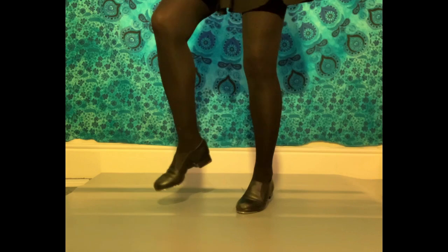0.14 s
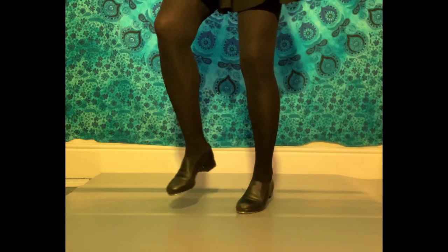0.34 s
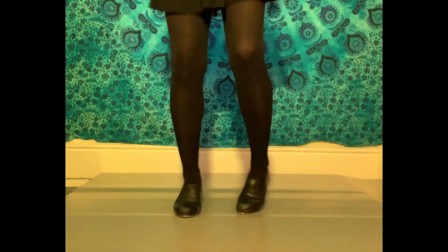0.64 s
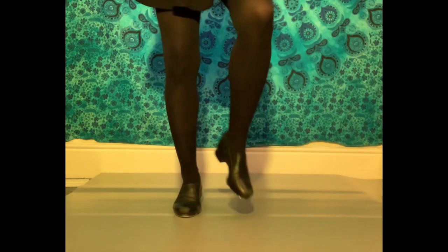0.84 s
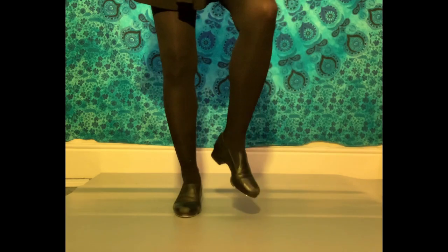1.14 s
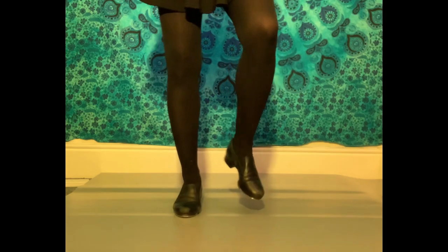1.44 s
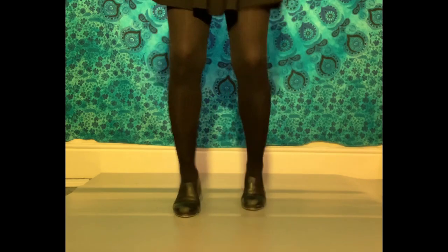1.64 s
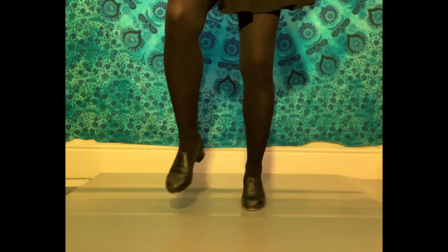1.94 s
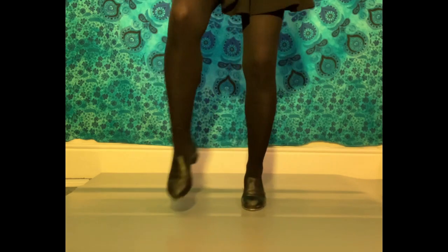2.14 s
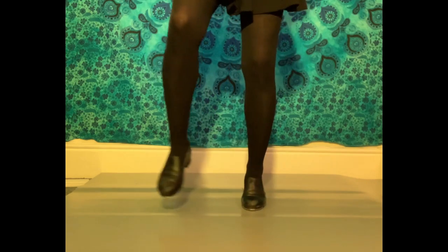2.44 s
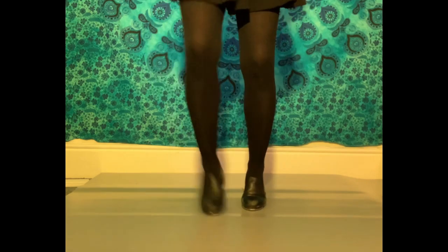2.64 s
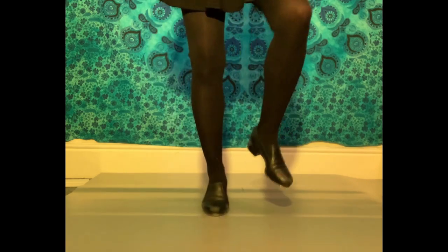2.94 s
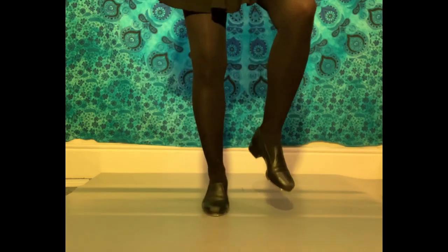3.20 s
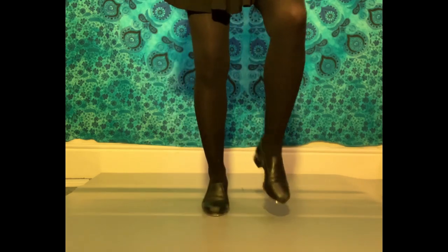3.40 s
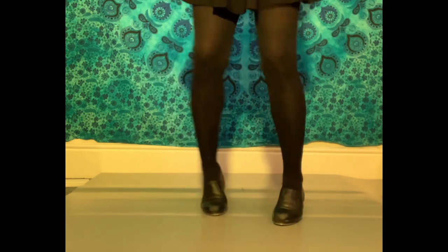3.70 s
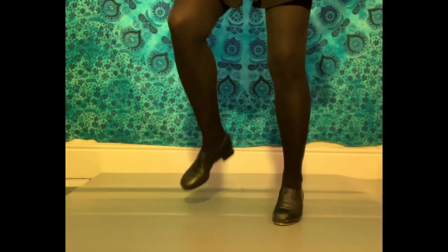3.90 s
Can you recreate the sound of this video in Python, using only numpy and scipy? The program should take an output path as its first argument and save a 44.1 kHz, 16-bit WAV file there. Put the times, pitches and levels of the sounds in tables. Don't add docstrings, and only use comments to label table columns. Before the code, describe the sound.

Four single tap-shoe strikes, about a second apart, crack on a hard board in a small quiet room, each with a low floor boom.

```python
import sys
import numpy as np
from scipy import signal
from scipy.io import wavfile

SR = 44100
rng = np.random.default_rng(int(sys.argv[2]) if len(sys.argv) > 2 else 0)


def master_out(mix):
    frames = np.transpose(np.atleast_2d(mix))
    ceiling = np.clip(frames, -1, 1)
    pcm = np.round(ceiling * 32767).astype(np.int16)
    wavfile.write(sys.argv[1], SR, pcm)


def rack_gain(trim_db):
    fader = np.asarray(trim_db, float)
    return 10 ** (fader / 20)


N = 178998

# start_s [s], boom_db [dB], boom_hz [Hz], sway_db [dB]
LANDINGS = [
    (0.654, -18, 75.3, -31),
    (1.707, -15.5, 76, -32.5),
    (2.763, -21, 75.8, -36.5),
    (3.724, -17, 70.1, -37),
]


def at_hz(points, hz):
    table = np.array(points)
    return np.interp(np.log(hz), np.log(table[:, 0]), table[:, 1])


def rms_one(x):
    return x / np.sqrt(np.mean(x ** 2) + 1e-20)


def early_rms_one(x):
    return x / np.sqrt(np.mean(x[:SR // 20] ** 2))


def add(out, start_s, sound):
    at = max(round(start_s * SR), 0)
    out[at:at + len(sound)] += sound[:max(N - at, 0)]


def unit_click(length):
    click = np.zeros(length)
    click[0] = 1
    return click


def wander(length, step):
    knots = length // step + 2
    return np.interp(np.arange(length) / step, np.arange(knots), rng.standard_normal(knots))


def ring(x, hz, t60):
    radius = rack_gain(-60 / (t60 * SR))
    angle = 2 * np.pi * hz / SR
    return signal.lfilter([0, np.sin(angle)], [1, -2 * radius * np.cos(angle), radius ** 2], x + 1e-18)


def bands(white):
    edges_hz = 20 * 2 ** np.arange(0, 9.8, 1 / 3)
    for k, (low, high) in enumerate(zip(edges_hz, edges_hz[1:])):
        sos = signal.butter(2, [low, high], "band", fs=SR, output="sos")
        yield np.sqrt(low * high), signal.sosfilt(sos, white[k % 2])


def room_tail(colour_db, build_s, stretch, rough_db):
    # band_hz [Hz], t60_s [s]
    room_t60 = [(120, 0.32), (350, 0.29), (1000, 0.3), (2700, 0.26), (4500, 0.21), (6500, 0.21),
                (10000, 0.2), (15000, .2)]
    t = np.arange(SR * 2 // 3) / SR
    bursts = rack_gain(rough_db * np.exp(-t / 0.052) * wander(len(t), step=SR // 1200))
    build = (1 - np.exp(-t / build_s)) ** 2
    white = rng.standard_normal((2, len(t))) * bursts * build
    tail = np.zeros(len(t))
    for hz, band in bands(white):
        if hz > 90:
            decay_db = -60 * t / (stretch * at_hz(room_t60, hz))
            patches_db = 1.7 * wander(len(t), step=SR // 40)
            tail += rack_gain(colour_db(hz) + decay_db + patches_db) * band
    return early_rms_one(tail)


def background():
    # band_hz [Hz], density_db [dB per Hz]
    hum_colour = [(12, -36), (20, -5.5), (74, -3), (90, -9), (109, -19.5), (171, -14), (267, -27.5),
                  (353, -23.5), (551, -28.5), (837, -22), (1170, -35), (2410, -37), (3190, -41),
                  (4840, -41), (15600, -51.5)]
    # tone_hz [Hz], level_db [dB rms]
    whines = [(468, -68), (791, -78), (2550, -79.5), (8296, -83.5)]
    t = np.arange(SR) / SR
    swell_db = 1 * wander(N, step=round(0.73 * SR))
    shake_db, rise_s, fall_s = 5, .1, .1
    for start_s, *_ in LANDINGS:
        add(swell_db, start_s, 2 * shake_db * (1 - np.exp(-t / rise_s)) * np.exp(-t / fall_s))
    swell_db -= swell_db.mean()
    white = rng.standard_normal((2, N + SR // 2))
    hum = np.zeros(N)
    for hz, band in bands(white):
        hum += rack_gain(at_hz(hum_colour, hz) + swell_db * (hz < 110)) * band[-N:]
    tones = sum(rack_gain(db) * rms_one(ring(white[0], hz, 0.11)[-N:]) for hz, db in whines)
    return rack_gain(-47.5) * rms_one(hum) + tones


def earlier_knock():
    # band_hz [Hz], density_db [dB per Hz]
    earlier_colour = [(120, -57), (200, -20), (242, -37.5), (317, -6.5), (430, -15.5), (488, -24.5),
                      (563, -14), (762, -16.5), (1400, -15.5), (1560, -12.5), (2810, -26.5), (3870, -21.5),
                      (9000, -39), (11700, -77), (19800, -120)]
    # mode_hz [Hz], level_db [dB], t60_s [s]
    earlier_modes = [(337, -36, 0.19), (490, -51.5, .9), (800, -49, .2), (1450, -48, 0.3), (1548, -52, .4),
                     (1580, -48, 0.55), (3850, -60, .5), (3900, -63, .5), (4016, -60, .4)]
    out = np.zeros(N)
    tail = room_tail(lambda f: at_hz(earlier_colour, f), build_s=0.00033, stretch=3.8, rough_db=1.5)
    add(out, 0, rack_gain(-51) * tail)
    click = unit_click(N)
    return out + sum(rack_gain(db) * ring(click, hz, t60) for hz, db, t60 in earlier_modes)


def clock():
    # band_hz [Hz], density_db [dB per Hz]
    clock_colour = [(530, -46), (900, -11), (1390, 0.5), (1630, -5.5), (2300, -8), (3350, -20), (5000, -27),
                    (6500, -53), (11000, -120)]
    pendulum_s = 1.999
    out = np.zeros(N)
    for swing in range(2):
        for start_s, level_db in ((.389, -60), (1.405, -62.5)):
            tail = room_tail(lambda f: at_hz(clock_colour, f), build_s=.006, stretch=.9, rough_db=3.0)
            add(out, start_s + pendulum_s * swing, rack_gain(level_db) * tail)
    return out


def soles():
    # start_s [s], level_db [dB], tilt_db [dB per octave], build_s [s]
    scuffs = [
        (0.734, -50.5, -3.5, 0.01),
        (1.648, -65, -4, .005),
        (1.9, -66.5, -1.5, .015),
        (2.808, -50, -2.5, 0.01),
        (2.921, -59, -7.5, 0.014),
        (3.675, -74, 0.5, 0.0039),
        (3.85, -52.5, -5, 0.018),
    ]
    out = np.zeros(N)
    for start_s, level_db, tilt_db, build_s in scuffs:
        colour = lambda f: tilt_db * np.log2(f / 4000) - 12 * max(np.log2(1500 / f), 0)
        add(out, start_s, rack_gain(level_db) * room_tail(colour, max(build_s, .001), stretch=.55, rough_db=2.5))
    return out


def beating(hz, split, t60):
    click = unit_click(SR * 2 // 3)
    swell = ring(ring(click, (1 + split) * hz, t60), (1 - split) * hz, t60)
    return swell / np.abs(swell).max()


def floor_answers():
    out = np.zeros(N)
    for start_s, boom_db, boom_hz, sway_db in LANDINGS:
        boom = rack_gain(boom_db) * beating(boom_hz, split=.075, t60=0.39)
        sway = rack_gain(sway_db) * beating(33, split=0.034, t60=.6)
        add(out, start_s, boom + sway)
    return out


def resonances(peaks):
    click = unit_click(SR // 2)
    modes = np.zeros(len(click))
    for hz, width_hz, db in peaks:
        t60 = np.clip(4.0 / width_hz, .06, .3)
        mode = ring(ring(click, hz, 0.074), hz, t60)
        modes += rack_gain(db) * rms_one(mode) * rng.choice([-1, 1])
    return early_rms_one(modes)


def board_cycles(hz):
    t = np.arange(SR // 100) / SR
    turns = hz * (.8 * t + .0007 * (1 - np.exp(-t / .001)))
    peak_s = .0009
    board = np.sin(2 * np.pi * turns) * t / peak_s * np.exp(1 - t / peak_s)
    return board - board.mean()


def plate_crack(clicks):
    cracks = .8 * clicks
    cracks[0] += 0.2
    flutter_s, first_db, loss_db = .0052, -5, 2.5
    turn = np.arange(1, 13)
    returns = ((turn + .06 * rng.standard_normal(len(turn))) * flutter_s * SR).astype(int)
    cracks[returns] += rack_gain(first_db - loss_db * turn + 2.5 * rng.standard_normal(len(turn)))
    modes = ((3800, 0.0071, 1), (6200, 0.0045, 1), (7400, .004, -0.78),
             (9500, 0.0023, 0.58), (13000, .002, .4))
    return sum(gain * ring(cracks, hz, t60) for hz, t60, gain in modes)


def board_thud(clicks):
    # mode_hz [Hz], level_db [dB], t60_s [s]
    thud_modes = [(178, -4.5, 0.084), (266, 1.5, 0.037), (355.6, 5.5, 0.038), (473, 2, 0.054)]
    thud = np.zeros(len(clicks))
    for k, (hz, db, t60) in enumerate(thud_modes):
        thud += rack_gain(db) * ring(clicks, hz, t60) * (-1) ** k
    push_s, width_s, push_db = .0052, .0007, 11
    lag = (np.arange(len(clicks)) / SR - push_s) / width_s
    return thud - rack_gain(push_db) * lag * np.exp(-lag ** 2 / 2)


def knock(foot, thud_db):
    # delay_s [s], left_db [dB], right_db [dB]
    echoes = [(0, -12, 1.5), (.0017, 1, -25), (.0049, -5, -4), (.0075, -14, -12), (.0152, -5, -9),
              (.0205, -9, -10)]
    clicks = np.zeros(SR // 8)
    for k, echo in enumerate(echoes):
        clicks[round(echo[0] * SR)] = rack_gain(echo[1 + foot]) * (-1) ** k
    board = np.convolve(clicks, board_cycles((1147, 1276)[foot]))[:len(clicks)]
    return board + rack_gain(-11.0) * plate_crack(clicks) + rack_gain(thud_db) * board_thud(clicks)


def taps():
    # start_s [s], peak_db [dB], tail_db [dB], pitch_factor [ratio, by landing spot], thud_db [dB]
    tap_list = [
        (.6295, -1.5, -15, 1, -16.5),
        (1.6648, -3, -18.5, 1.32, -16),
        (2.7123, -8.5, -20, .985, -13.5),
        (3.7062, -3, -15, 1.02, -19.5),
    ]
    # band_hz [Hz], density_db [dB per Hz]
    left_plate = [(59, -29), (100, -4.5), (134, 0), (209, -9.5), (281, -7), (564, -1), (760, -5.5),
                  (1400, -9), (2000, -6.5), (2810, -22.5), (4020, -6.5), (5100, -11.5), (6120, -26),
                  (10400, -24.5), (15500, -47.5)]
    right_plate = [(59, -36), (100, -2.5), (253, -15.5), (457, -6), (552, -16), (654, -3.5), (697, -8),
                   (1290, -9.5), (2220, -8.5), (2750, -11), (3460, -8.5), (4960, -21.5), (6300, -12.5),
                   (8500, -24), (15500, -36)]
    # mode_hz [Hz], width_hz [Hz], level_db [dB]
    left_spot = [(555.7, 50, 6), (450, 45, -4), (915, 70, -13), (740, 50, -10), (1107, 50, -6),
                 (1367, 61, -6), (1607, 38, -13), (1985, 110, 0.5), (3400, 80, -13.5), (3940, 39, -6.5),
                 (4360, 35, -10), (4600, 49, -14)]
    right_spot = [(458.6, 18, 2.5), (643.5, 31, 0), (1113, 60, 5), (1610, 90, -7.5), (1891, 33, 6.5),
                  (2350, 21, 1), (3320, 51, -9), (3410, 60, -7.5), (3810, 31, -8.5), (4320, 27, -7.5)]
    # band_hz [Hz], density_db [dB per Hz]
    hush_colour = [(300, -9), (800, -15), (1500, -6.5), (2500, -7), (3500, -11.5), (4900, -6), (6500, -14),
                   (12000, -22)]
    out = np.zeros(N)
    for k, (start_s, peak_db, tail_db, pitch_factor, thud_db) in enumerate(tap_list):
        foot = k % 2
        plate = (left_plate, right_plate)[foot]
        spot = np.array((left_spot, right_spot)[foot]) * [pitch_factor, 1, 1]
        bright_db = (-0.17, 0.1)[foot]
        spot_db = tail_db - (4, 4.5)[foot]
        colour = lambda f: at_hz(plate, f) + bright_db * max(np.log2(f / 3000), 0)
        near = room_tail(colour, build_s=.003, stretch=1, rough_db=4.5)
        far = room_tail(lambda f: at_hz(hush_colour, f), build_s=.05, stretch=3.7, rough_db=2.8)
        add(out, start_s, rack_gain(peak_db) * knock(foot, thud_db))
        add(out, start_s, rack_gain(tail_db) * near)
        add(out, start_s, rack_gain(spot_db) * resonances(spot))
        add(out, start_s, rack_gain(tail_db - 47) * far)
    return out


def scene():
    quiet = background() + earlier_knock() + clock() + soles()
    return (quiet + floor_answers() + taps())[None]


def top_cut(x):
    return signal.sosfilt(signal.butter(12, 16700, fs=SR, output="sos"), x)


def record(dry):
    low_pass = signal.cheby2(14, 50, 16150, fs=SR, output="sos")
    limited = signal.sosfilt(low_pass, np.clip(dry, -.95, .95))
    return top_cut(np.clip(limited, -.96, .96))


dry = scene()
out = record(dry)
master_out(out)
```